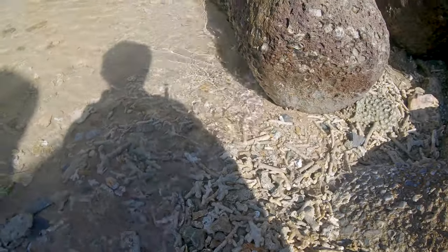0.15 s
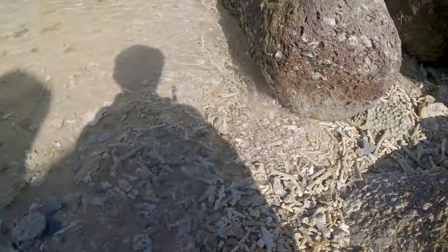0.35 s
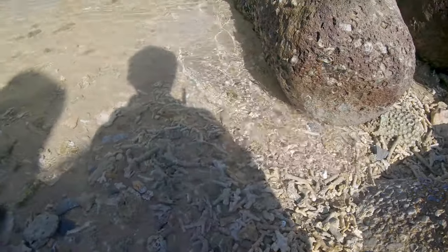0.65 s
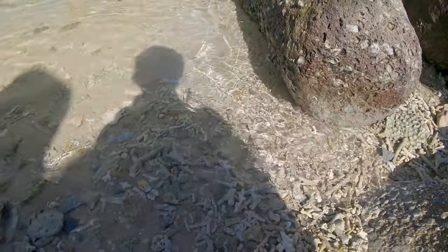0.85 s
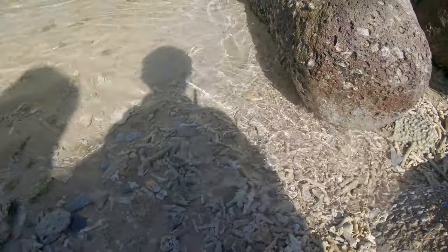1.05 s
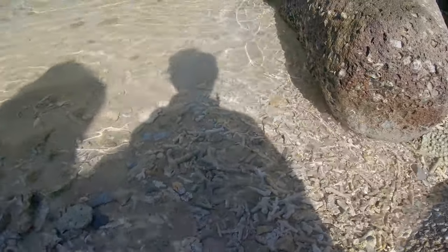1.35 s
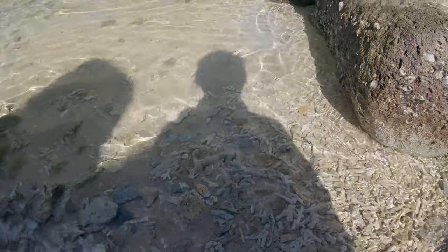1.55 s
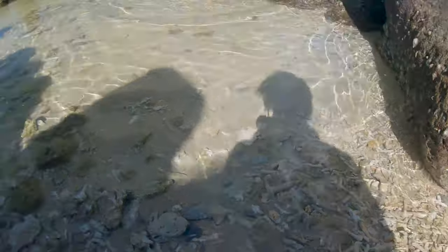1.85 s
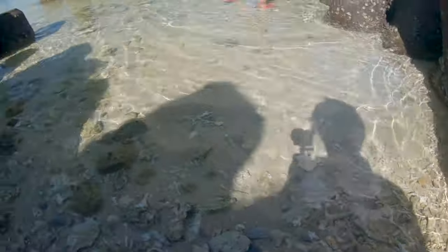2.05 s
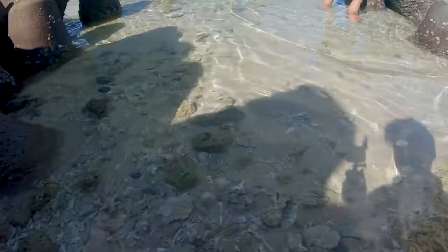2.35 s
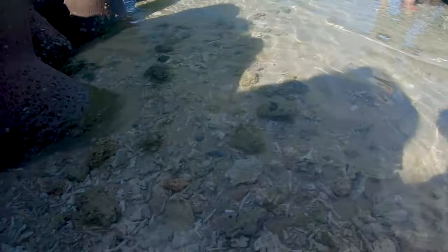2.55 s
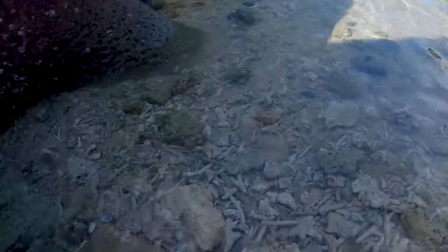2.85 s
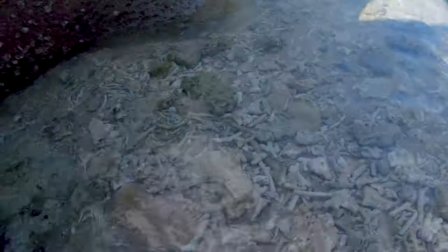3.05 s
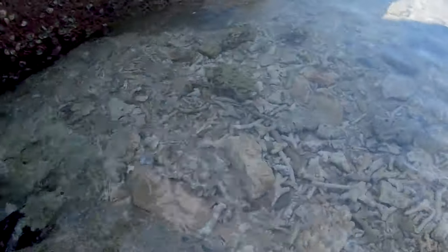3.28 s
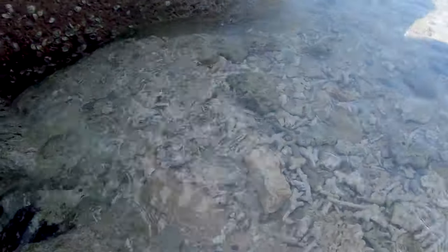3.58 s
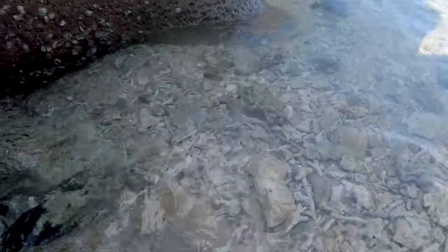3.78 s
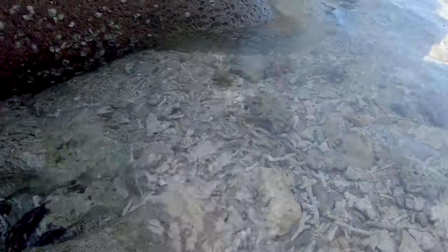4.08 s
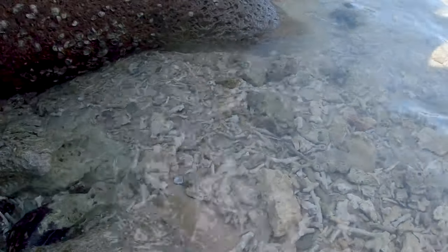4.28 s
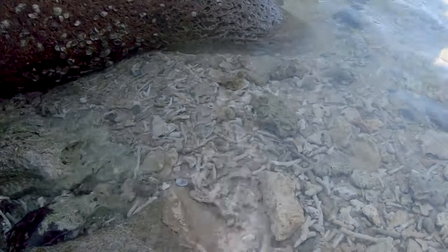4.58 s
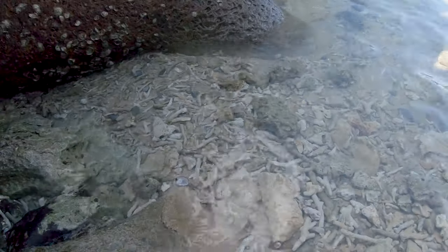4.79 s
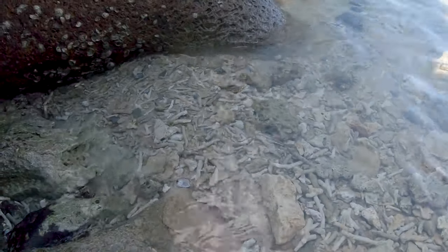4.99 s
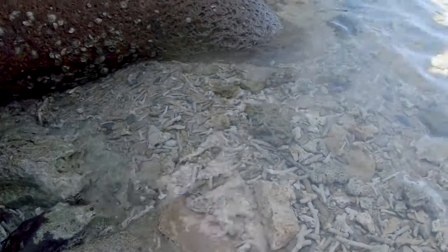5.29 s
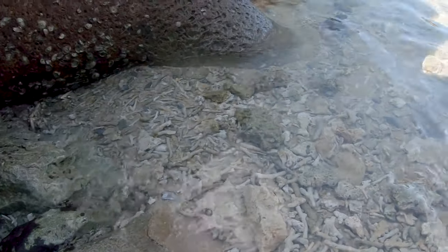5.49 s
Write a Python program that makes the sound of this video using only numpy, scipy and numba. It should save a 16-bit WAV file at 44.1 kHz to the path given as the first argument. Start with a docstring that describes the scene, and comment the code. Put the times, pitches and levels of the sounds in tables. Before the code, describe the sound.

Small swells splash and gurgle over coral rubble close by, with a crunchy clatter midway, then fade to faint trickling over low rumble.

```python
"""Small swells run up a shore of coral rubble between boulders and drain away again, close to the microphones.
Clouds of damped sines are the bubbles that gurgle, babble and fizz; filtered noise is the sheet of water.
Single plops, chirps and gulps are gliding sines; coral sticks crunch as noise bursts and clink as resonators.
Slow noise is wind on the microphone pair; a distant drone and open sea, also noise, lie underneath."""
import sys
import numpy as np
from scipy import signal
from scipy.fft import rfft, irfft, next_fast_len
from scipy.io import wavfile
from scipy.ndimage import uniform_filter1d
from numba import njit

SR = 44100
rng = np.random.default_rng(int(sys.argv[2]) if len(sys.argv) > 2 else 0)


def to_wav(s):
    """Save 16-bit WAV."""
    ch = np.atleast_2d(s).T  # columns
    pcm = np.round(np.clip(ch, -1, 1) * 32767)  # PCM
    wavfile.write(sys.argv[1], SR, pcm.astype(np.int16))


N = 248283


def from_db(db):
    """Decibels to gain."""
    return 10 ** (np.asarray(db) / 20)


def rms_one(x):
    """Scale to unit power."""
    return x / np.sqrt(np.mean(x ** 2) + 1e-20)


def at_hz(points, hz):
    """Read a spectrum on a log-frequency axis."""
    f, value = np.transpose(points)
    return np.interp(np.log(np.maximum(hz, 1)), np.log(f), value)


def colour(x, points, share=1):
    """Causal (minimum-phase) filter with the given spectrum, its decibels scaled by share."""
    size = 16384
    level_db = share * at_hz(points, np.fft.rfftfreq(size, 1 / SR))
    cepstrum = irfft(np.log(from_db(level_db)))
    # folding the cepstrum onto positive time makes the phase minimal
    cepstrum[1:size // 2] *= 2
    cepstrum[size // 2 + 1:] = 0
    response = irfft(np.exp(rfft(cepstrum)))[:size // 2]
    padded = next_fast_len(N + size)
    return irfft(rfft(x, padded) * rfft(response, padded), padded)[..., :N]


def band(x, low_hz, high_hz, order=2):
    """Butterworth band-pass."""
    edges = [low_hz, min(high_hz, SR / 2 - 1)]
    return signal.sosfilt(signal.butter(order, edges, "band", fs=SR, output="sos"), x + 1e-18)


def steady(x, span_s):
    """About unit power over every stretch of span_s; quicker detail stays."""
    power = uniform_filter1d(np.mean(x ** 2, axis=0), int(span_s * SR) + 1)
    smooth_power = uniform_filter1d(power, int(span_s * SR / 2) + 1)
    return x / np.sqrt(np.abs(smooth_power) + 1e-12)


def stereo_noise(alike):
    """White noise with the given left-right correlation."""
    mid, side = rng.standard_normal((2, N))
    alike = np.clip(alike, -1, 1)
    return (np.sqrt(1 + alike) * mid + np.sqrt(1 - alike) * side * [[1], [-1]]) / np.sqrt(2)


def sides(pan_db):
    """Left and right gains with a mean of one."""
    gains = from_db(np.array([pan_db, -pan_db]) / 2)
    return gains / gains.mean(axis=0)


def add(out, s, sound):
    """Mix a short stereo sound in at time s."""
    i = max(int(s * SR), 0)
    out[:, i:i + sound.shape[1]] += sound[:, :max(N - i, 0)]


def crackle(per_s, spread_db, pan_db):
    """Random clicks, mostly small, each from a direction of its own."""
    at, size, sign, pan, lag = rng.random((int(per_s * N / SR), 5)).T
    height = from_db(spread_db * np.minimum(-np.log(1 - size), 4.5)) * np.sign(sign - .5)
    left, right = sides(pan_db * (2 * pan - 1)) * height
    at = (at * N).astype(int)
    late = np.round(3 * (2 * lag - 1)).astype(int)   # samples, either way
    return np.array([np.bincount(at, left, N), np.bincount((at + late) % N, right, N)])


@njit
def ring_bubbles(start, gains, step, decay, rise, lag, length):
    """Damped sines, climbing as bubbles near the surface; the right side is lag samples later (or earlier)."""
    out = np.zeros((2, length))
    for k in range(len(start)):
        life, height, fade = int(6 / decay[k]), 1.0, np.exp(-decay[k])
        first = max(start[k], abs(lag[k]))
        for i in range(min(life, length - first - abs(lag[k]))):
            value = height * np.sin(step[k] * i * (1 + rise[k] * i / life))
            out[0, first + i] += gains[0, k] * value
            out[1, first + i + lag[k]] += gains[1, k] * value
            height *= fade
    return out


def bubble_cloud(per_s, low_hz, high_hz, cycles, spread_db, rise, pan_db=13.0, lag_s=0.00029):
    """Bubbles born at random, with scattered size, pitch, damping and direction."""
    at, size, pitch, damping, climb, pan, lag = rng.random((int(per_s * N / SR), 7)).T
    hz = low_hz * (high_hz / low_hz) ** pitch
    ring_cycles = cycles * 3.4 ** (2 * damping - 1)   # until 60 dB down
    decay = np.log(1000) * hz / (ring_cycles * SR)
    height = from_db(spread_db * np.minimum(-np.log(1 - size), 4.0)) * np.sqrt(hz / low_hz)
    gains = sides(pan_db * (2 * pan - 1)) * height
    start = (at * N).astype(np.int64)
    lag_samples = (lag_s * SR * (2 * lag - 1)).astype(np.int64)
    return ring_bubbles(start, gains, 2 * np.pi * hz / SR, decay, rise * 2 * climb, lag_samples, N)


def churn(depth_db, per_s):
    """Water tumbles unevenly: a random gain that changes per_s times a second."""
    steps = rng.standard_normal(2000)
    return from_db(depth_db * np.interp(np.arange(N) * per_s / SR, np.arange(len(steps)), steps))


def surge_db(crest_s, hold_s, build, drain):
    """Level that climbs to a crest, holds and falls, at so many dB a second."""
    t = np.arange(N) / SR - crest_s
    return np.maximum(build * np.minimum(t, 0) - drain * np.maximum(t - hold_s, 0), -120)


SLACK_PAN_DB = -4   # left-right balance of the slack water
# Swells running up the shore. Each row: crest in seconds, hold in seconds, build in dB/s,
# drain in dB/s before each water sound's own ratio, level in dB before each water sound's own offset,
# gurgle offset in dB, spray offset in dB, splashiness in dB, left-right balance in dB.
SWELLS = [(0.19, 0.093, 62, 46.5, -34.5, -15, -13.5, 2.5, -0.5),
          (1.161, 0.28, 400, 34, -55, -1.5, -6.5, -2.5, 0),
          (2.081, 0.23, 380, 100, -34.5, -12.5, -8, -5, -7.5),
          (2.401, 0.24, 61, 81, -31.5, -11, -12, -4.5, -5.5),
          (2.826, 0.024, 450, 242, -32.5, -8, -18, -6, 1), (3, 0.047, 123, 54, -44.5, -5, 0, 3.5, -4.5),
          (3.502, 0.24, 144, 26, -52.5, -2.5, -3.5, -4, -6), (4.944, 0.31, 48, 83, -57, -8, -4.5, -1, -4.5)]


def follow_swells(extra_db, drain_ratio, slack_db):
    """Left and right gain of one kind of water sound: all swells add in power over the slack water."""
    power = (from_db(slack_db) * sides(SLACK_PAN_DB)[:, None]) ** 2
    extras = extra_db + np.zeros(len(SWELLS))
    for (crest, hold, build, drain, db, *_, pan_db), extra in zip(SWELLS, extras):
        level_db = db + extra + surge_db(crest, hold, build, drain * drain_ratio)
        power = power + (from_db(level_db) * sides(pan_db)[:, None]) ** 2
    return np.sqrt(power)


# For each water sound: level against the swell (dB), draining speed against it (ratio), slack level (dB)
GURGLE_DB, GURGLE_DRAIN, GURGLE_SLACK_DB = -1, 1, -75
BABBLE_DB, BABBLE_DRAIN, BABBLE_SLACK_DB = -.5, 1.1, -76
SPRAY_DB, SPRAY_DRAIN, SPRAY_SLACK_DB = -4.5, 0.56, -67
SHEET_DB, SHEET_DRAIN, SHEET_SLACK_DB = -10.5, 1.65, -74.5
DROPLET_DB, DROPLET_DRAIN, DROPLET_SLACK_DB = -7, 0.88, -67.5


def gurgle(gurgle_db):
    """Low, heavily damped bubbles trapped by the swell."""
    bubbles = bubble_cloud(400, 395.0, 1090, cycles=8.9, spread_db=4.0, rise=0.15, pan_db=16.5)
    level = follow_swells(GURGLE_DB + gurgle_db, GURGLE_DRAIN, GURGLE_SLACK_DB)
    return steady(band(bubbles, 200, 1300), 0.19) * level


# Foaming water close by. Each row: frequency in Hz, relative level in dB.
WATER_SPECTRUM = [(120, -25), (200, -46), (596, -7), (769, -1.5), (1050, -3.5), (1560, 0.5), (2210, -2),
                  (2900, 0), (4180, -7.5), (5110, -4), (8980, -1), (12500, -1), (15500, -29)]


def babble(froth, tumble):
    """Slack water is mostly distinct ringing bubbles; a strong swell brings a dense froth of them."""
    trickle = steady(bubble_cloud(480, 850, 3000, cycles=30, spread_db=4.2, rise=.18, pan_db=11.0), .07)
    foam = bubble_cloud(1500, 700, 4500, cycles=14, spread_db=4.4, rise=.15, pan_db=11.0)
    splash = band(crackle(1400, 3.7, 4.9), 300, 3440)
    foam = colour(rms_one(foam) + .5 * rms_one(splash), WATER_SPECTRUM) * tumble
    return np.sqrt(1 - froth) * trickle + np.sqrt(froth) * steady(foam, 0.057)


STRAYS_PER_S, STRAY_DB, STRAY_FOLLOWS = 28, -62, 0.63   # rate, rms where babble is -57.5 dB, share of its swing


def stray_bubbles(flow):
    """Sparse, long-ringing bubbles at random, swinging less than the babble does."""
    strays = bubble_cloud(STRAYS_PER_S, 1293, 3220, cycles=48.6, spread_db=2.2, rise=0.144, pan_db=3.5)
    return rms_one(strays) * from_db(STRAY_DB) * (flow / from_db(-57.5)) ** STRAY_FOLLOWS


LAP_DB, LAPS_PER_S = 1, 22   # small ripples make the spray come and go
# Fizzing spray close by. Each row: frequency in Hz, relative level in dB.
SPRAY_SPECTRUM = [(1760, -33), (3000, -34), (3280, 0.5), (4590, -1), (6750, 5.5), (7690, -2), (8950, 2),
                  (9920, 1), (11800, -9.5), (14500, -17), (15500, -40)]


def spray(spray_db, froth, tumble):
    """The smallest bubbles ring only briefly and burst with a tick; now and then a bigger one pops."""
    fizz = rms_one(bubble_cloud(800, 3800, 11000, cycles=24, spread_db=4.8, rise=.06, pan_db=9.0))
    bursts = rms_one(crackle(2200, 4.2, 7.0))
    pops = rms_one(crackle(45, 2.1, 3.8))
    mist = (fizz + .85 * bursts + .5 * stereo_noise(.15)) * tumble
    sound = steady(colour(mist, SPRAY_SPECTRUM), .18) + 0.58 * rms_one(colour(pops, SPRAY_SPECTRUM))
    ripples = churn(LAP_DB, LAPS_PER_S) ** (1 - froth)   # froth evens them out
    return sound * ripples * follow_swells(SPRAY_DB + spray_db, SPRAY_DRAIN, SPRAY_SLACK_DB)


def droplets(splashy_db):
    """Small, high bubbles, more of them heard in a splashy swell through a higher level."""
    bubbles = bubble_cloud(320, 2600, 6400, cycles=36, spread_db=4.0, rise=.14, pan_db=9.0)
    return steady(bubbles, .12) * follow_swells(DROPLET_DB + splashy_db, DROPLET_DRAIN, DROPLET_SLACK_DB)


SHEET_BREAKUP = 0.56   # dB of smooth hiss lost for each dB of splashiness
# Smooth sheet of running water. Each row: frequency in Hz, relative level in dB.
SHEET_SPECTRUM = [(150, -60), (250, -18), (392, -7), (573, -7), (768, -9.5), (2200, 1.5), (2440, 1.5),
                  (4630, -10.5), (8920, -14.5), (15500, -44)]


def sheet(splashy_db):
    """Smooth noise of the running sheet of water, weaker where the swell is splashy."""
    hiss = rms_one(colour(stereo_noise(0.21), SHEET_SPECTRUM))
    return hiss * follow_swells(SHEET_DB - SHEET_BREAKUP * splashy_db, SHEET_DRAIN, SHEET_SLACK_DB)


def wash():
    """All the water sounds that rise and drain with the swells."""
    *_, gurgle_db, spray_db, splashy_db, _ = np.transpose(SWELLS)
    flow = follow_swells(BABBLE_DB, BABBLE_DRAIN, BABBLE_SLACK_DB)
    flow_db = 20 * np.log10(flow.mean(axis=0))
    froth = np.clip((flow_db + 63) / 30, .2, .75)   # share of foam in the babble
    tumble = churn(3.2, 90)   # shared by foam and spray
    return (flow * babble(froth, tumble) + stray_bubbles(flow) + gurgle(gurgle_db)
            + spray(spray_db, froth, tumble) + droplets(splashy_db) + sheet(splashy_db))


BREEZE_DB, BREEZE_PAN_DB = -50.5, 0   # steady air between gusts: rms level, left-right balance
WIND_TRIM_DB = 2.5   # gain of all gusts
# Wind at the microphones. Each row: frequency in Hz, relative level in dB.
WIND_SPECTRUM = [(8.8, 2), (15, 1), (54, 4), (74, -0.5), (108, -15.5), (130, -9), (170, -31), (290, -120)]
# Gusts at the microphones. Each row: peak in seconds, half width in seconds (amplitude down to 1/e),
# level in dB before WIND_TRIM_DB, left-right balance in dB.
GUSTS = [(0.07, 0.057, -38.5, 11), (0.18, 0.093, -41, 5), (1.19, 0.14, -45.5, 4), (1.42, 0.17, -45, -1),
         (1.73, .035, -33, 11), (1.88, 0.17, -44.5, 2.5), (2.61, 0.1, -42.5, 5), (2.95, 0.23, -46.5, 3),
         (3.62, 0.17, -53, -2), (4.36, 0.025, -42, 3), (4.86, 0.062, -36.5, 1), (5.06, 0.054, -37, 11),
         (5.169, 0.041, -35, 13), (5.29, 0.089, -39.5, 3), (5.62, 0.14, -48.5, 4)]


def wind():
    """Low noise buffets each microphone differently; breeze and gusts add in power."""
    t = np.arange(N) / SR
    power = (from_db(BREEZE_DB) * sides(BREEZE_PAN_DB)[:, None]) ** 2
    for s, width, db, pan_db in GUSTS:
        peak = from_db(db + WIND_TRIM_DB) * sides(pan_db)[:, None]
        power = power + peak ** 2 * np.exp(-2 * ((t - s) / width) ** 2)
    return np.sqrt(power) * steady(colour(stereo_noise(.4), WIND_SPECTRUM), .08)


DRONE_DB, DRONE_WANDER_DB = -53, 1.3   # typical level halfway through, and how much it wavers
DRONE_GROWTH_DB_PER_S = .5   # slowly louder
# Drone far off. Each row: frequency in Hz, relative level in dB.
DRONE_SPECTRUM = [(53, -40), (90, -1), (108, -12), (134, -3), (161, -10), (189, -6), (220, -12), (280, -29),
                  (333, -22), (420, -39), (550, -52), (920, -120)]


def drone():
    """A distant low rumble of noise reaches both microphones alike, wavering and slowly growing."""
    t = np.arange(N) / SR
    level = from_db(DRONE_DB + DRONE_GROWTH_DB_PER_S * (t - t.mean())) * churn(DRONE_WANDER_DB, 8)
    return level * steady(colour(stereo_noise(1.0), DRONE_SPECTRUM), 0.18)


FAR_SEA_DB = -65   # rms level
# Open water far off. Each row: frequency in Hz, relative level in dB.
FAR_SEA_SPECTRUM = [(150, -48), (250, 17.5), (458, -4.5), (795, 6), (961, -3), (1730, 0.5), (3890, -45),
                    (7000, -44), (9890, -11.5), (13700, -22), (15500, -45)]


def far_sea():
    """Open water sounds faintly and evenly: wide, coloured noise."""
    return from_db(FAR_SEA_DB) * rms_one(colour(stereo_noise(0.14), FAR_SEA_SPECTRUM))


SPLASH_CYCLES = 11.3   # a plop that rings this many cycles is as much splash as tone
# The loudest plops near the microphones. Each row: start in seconds, level in dB before a common trim,
# starting pitch in Hz, left-right balance in dB, cycles to die away by 60 dB.
PLOPS = [(0.128, -22, 1480, 4, 21), (0.15, -21.5, 980, 2, 23), (0.159, -13.5, 2880, 1, 50),
         (0.178, -22, 820, -4, 26), (0.203, -10, 2900, 0, 35), (0.234, -11, 2820, 1, 57),
         (0.249, -14.5, 2040, 2, 24), (0.256, -18, 1610, -2, 29), (0.335, -18.5, 1530, 2, 22),
         (0.356, -22, 1180, 1, 24), (0.432, -28, 1800, 0, 72), (0.484, -28.5, 900, -6, 36),
         (0.509, -26, 946, -8, 25), (0.545, -19.5, 4990, 0, 59), (0.948, -32, 2630, -6, 38),
         (1.025, -38.5, 2540, -4, 60), (1.146, -33, 6550, -4, 100), (1.166, -30, 1730, 4, 19),
         (1.284, -33.5, 2000, 4, 45), (1.4, -35.5, 690, -5, 13), (1.423, -32, 1750, 1, 30),
         (1.598, -38, 1040, -8, 28), (1.625, -43, 644, -3, 42), (1.858, -37, 1260, -9, 19),
         (1.947, -31.5, 946, -6, 17), (1.99, -31, 3110, -10, 49), (2.041, -21.5, 2400, -6.5, 15.5),
         (2.129, -22.5, 2100, -14, 94), (2.438, -18.5, 1650, -14, 49), (2.661, -23, 915, 6, 33),
         (2.717, -25, 614, 3, 25), (2.81, -24, 840, 6, 45), (2.829, -22, 790, 8, 9.5),
         (2.905, -21, 1710, 6, 26.5), (2.995, -27, 1273, 8, 60), (3.284, -30, 2830, -7, 26),
         (3.488, -37, 975, -1, 20), (3.595, -38.5, 625, -11, 33), (3.683, -37, 2510, -9, 52),
         (3.738, -33, 805, -14, 17), (5.297, -40, 1140, -6, 30), (5.536, -39, 7280, -11, 170)]


def plops(rise_per_s=1.8, splash_s=0.0049, lag_s=0.000092, trim_db=-1.5):
    """A cavity pinches off with a short splash around its own pitch and rings on as one big bubble."""
    out, t = np.zeros((2, N)), np.arange(SR // 10) / SR
    for s, db, hz, pan_db, cycles in PLOPS:
        age = np.maximum(t - lag_s * rng.random((2, 1)), 0)   # each side a little late
        ring = from_db(-60 * age * hz / max(cycles, 2))
        tone = np.sin(2 * np.pi * hz * age * (1 + rise_per_s * age)) * ring
        noise = rng.standard_normal(len(t)) + .5 * rng.standard_normal((2, len(t)))
        splash = steady(band(noise, hz * 0.48, hz * 1.91), 0.002) * np.exp(-t / splash_s)
        attack = 1 - np.exp(-3 * age * hz)   # the onset takes a fraction of one cycle
        gains = from_db(db + trim_db) * sides(pan_db)[:, None]
        add(out, s, gains * (tone + SPLASH_CYCLES / cycles * splash) * attack)
    return out


# Bending modes of a coral stick. Each row: frequency in Hz, relative level in dB,
# 60 dB decay time in seconds for a stick free to ring.
CORAL_MODES = [(4630, -46, 0.032), (5850, -13.5, 0.09), (6900, -19, .03), (9720, -1.5, 0.025),
               (10500, -2, 0.027), (12200, -23, 0.035), (13400, -19, .04), (14200, -32, .04)]


def coral_ring(clicks, freedom=1):
    """The bending modes of a coral stick; one wedged in the heap is less free to ring."""
    out = 0
    for hz, db, t60 in CORAL_MODES:
        r, w = from_db(-60 / (t60 * freedom * SR)), 2 * np.pi * hz / SR
        mode = signal.lfilter([0, np.sin(w)], [1, -2 * r * np.cos(w), r * r], clicks + 1e-18)
        out = out + from_db(db) * mode
    return out


RUBBLE_PAN_DB = -10.0   # the loose rubble lies to the right
# Colour of cracking and grinding rubble. Each row: frequency in Hz, relative level in dB.
GRIT_SPECTRUM = [(180, -6.5), (300, 3), (953, -11.5), (1070, -13), (5480, -10.5), (6250, -4.5), (9760, -15),
                 (11300, -22), (14300, -24), (15500, -44)]
# Coral sticks knocking together. Each row: start in seconds, level in dB before the crack and ring trims,
# ringing share as a ratio.
KNOCKS = [(0.131, -30.5, .3), (0.204, -22, 0.23), (0.647, -29.5, 0.11), (0.933, -29.5, 0.12),
          (1.589, -34.5, 0.11), (2.590, -17, 0.052), (2.934, -22.5, 0.32), (3.037, -15, 0.33),
          (3.049, -13.5, 0.39), (3.067, -14, 1), (3.089, -20.5, .22), (3.145, -25, 0.17),
          (3.192, -19, 0.16), (3.26, -18.5, 0.21), (4.325, -21.5, 0.11)]


def knocks(crack_s=0.004, crack_trim_db=-3.5, ring_trim_db=-4.0):
    """Each knock is a dry crack of noise plus the ring of the stick."""
    cracks, strikes, t = np.zeros((2, N)), np.zeros((2, N)), np.arange(SR // 50) / SR
    for s, db, share in KNOCKS:
        noise = 0.58 * rng.standard_normal(len(t)) + 1.38 * rng.standard_normal((2, len(t)))
        add(cracks, s, from_db(db + crack_trim_db) * noise * np.exp(-t / crack_s))
        add(strikes, s, from_db(db + ring_trim_db) * share * np.ones((2, 1)))
    cracks = band(colour(cracks, GRIT_SPECTRUM), 490, 21000)   # light sticks give no bass
    return (cracks + coral_ring(strikes)) * sides(RUBBLE_PAN_DB)[:, None]


CHIRP_S, CHIRP_SHORTENING = .025, 0.33   # length at 1 kHz; power of pitch by which it shrinks
# The clearest singing cavities nearby. Each row: start in seconds, first pitch in Hz, last pitch in Hz,
# level in dB before a common trim.
CHIRPS = [(0.231, 2820, 2700, -25), (0.302, 1477, 1860, -28.5), (0.331, 1500, 2710, -30),
          (0.77, 2050, 2250, -44.5), (0.798, 1840, 1990, -44), (0.941, 1935, 1630, -42),
          (1.283, 1903, 2270, -38), (2.885, 1410, 1520, -29), (3.143, 5920, 5570, -30),
          (3.169, 5120, 5130, -37), (3.197, 4650, 4460, -38.5), (3.217, 927, 894, -39.5),
          (3.742, 753, 905, -41), (3.78, 1163, 1280, -39.5), (3.803, 1660, 2940, -41),
          (4.13, 1674, 2400, -52), (4.934, 4210, 4670, -47.5), (4.974, 910, 1430, -42.5),
          (4.978, 560, 540, -42), (4.986, 1530, 2750, -43), (5.215, 1140, 950, -50)]


def chirps(pan_db=-2.0, scatter_db=2.0, trim_db=-2.5):
    """The pitch runs away ever faster as the cavity closes; the moving water shakes the tone."""
    out = np.zeros((2, N))
    for s, first_hz, last_hz, db in CHIRPS:
        length_s = CHIRP_S * (1000 / first_hz) ** CHIRP_SHORTENING
        u = np.linspace(0, 1, int(length_s * SR))
        phase = 2 * np.pi * np.cumsum(first_hz + (last_hz - first_hz) * u ** 2) / SR
        shake = 1 + .35 * np.interp(u, np.linspace(0, 1, 12), rng.standard_normal(12))
        envelope = np.minimum(u / 0.048, 1) * np.sqrt(1 - u ** 2)
        gains = from_db(db + trim_db) * sides(pan_db + scatter_db * rng.standard_normal())[:, None]
        tone = np.sin(phase + .5 * rng.standard_normal((2, 1)))
        add(out, s, gains * envelope * shake * tone)
    return out


# Water slapping into hollows. Each row: start in seconds, level in dB before a common trim,
# starting pitch in Hz, cycles to die away by 60 dB.
GULPS = [(2.584, -16, 350, 5.5), (2.59, -22.5, 148, 7.2), (2.612, -28.5, 215, 12), (2.653, -20.5, 520, 11),
         (2.657, -24, 171, 7.5), (2.829, -24.5, 286, 2.4), (3.064, -26.5, 231, 3.3), (3.308, -23.5, 535, 5),
         (3.309, -31.5, 195, 5.9)]


def gulps(rise_per_s=1.4, slosh_db=-12, slosh_cycles_ratio=1.8, trim_db=3.0):
    """Large air pockets under the rocks give a few low cycles, and the water sloshes around them."""
    out, t = np.zeros((2, N)), np.arange(SR // 6) / SR
    for s, db, hz, cycles in GULPS:
        tone = np.sin(2 * np.pi * hz * t * (1 + rise_per_s * t)) * from_db(-60 * t * hz / cycles)
        slosh = steady(band(rng.standard_normal((1, len(t))), 190, 530), 0.0093)
        slosh = slosh * from_db(slosh_db - 60 * t * hz / (cycles * slosh_cycles_ratio))
        attack = 1 - np.exp(-t / 0.00031)
        add(out, s, from_db(db + trim_db) * sides(-1.3)[:, None] * (tone + slosh) * attack)
    return out


SLIP_BUILD_DB_PER_S, SLIP_SETTLE_DB_PER_S = 688, 550
# The heap of rubble slips and grinds. Each row: peak in seconds, level in dB.
SLIPS = [(3.038, -28), (3.149, -37), (3.21, -54)]


def grinding():
    """Grinding rubble is a swarm of tiny knocks, rising and settling with each slip."""
    grains = crackle(4000, 4.8, 4.9)
    # each chip rings briefly at a pitch of its own
    squeak = rms_one(bubble_cloud(1500, 5420, 11550, cycles=51, spread_db=2.0, rise=0))
    wedged = rms_one(coral_ring(band(grains, 2100, 7100), freedom=0.21))
    grind = steady(rms_one(colour(grains, GRIT_SPECTRUM)) + .5 * squeak + 0.36 * wedged, 0.042)
    slipping = sum(from_db(db + surge_db(s, 0, SLIP_BUILD_DB_PER_S, SLIP_SETTLE_DB_PER_S)) for s, db in SLIPS)
    return slipping * grind * sides(RUBBLE_PAN_DB)[:, None]


def boulders(x, wet_db, t60):
    """Nearby rocks scatter a brief tail, different on each side."""
    t = np.arange(SR // 8) / SR
    tail = rng.standard_normal((2, len(t))) * from_db(-60 * t / t60) * (t > .0012)
    tail /= np.sqrt(np.sum(tail ** 2, axis=1, keepdims=True))
    return x + from_db(wet_db) * signal.fftconvolve(x, tail, axes=1)[:, :N]


def scene():
    """Water and rubble among the rocks, over wind, drone and far sea."""
    shore = wash() + plops() + knocks() + chirps() + gulps() + grinding()
    return boulders(shore, wet_db=-6.5, t60=0.065) + wind() + drone() + far_sea()


CUTOFF_HZ = 16100
# Balance of the microphone pair. Each row: frequency in Hz, left minus right in dB.
EAR_TILT = [(30, -3.5), (70, 1.5), (130, -1), (500, 3), (2000, 0), (4500, 0), (8000, -6), (14000, 5)]


def record(dry):
    """The two microphones colour the sound differently; the very bottom and the top are cut."""
    heard = np.array([colour(dry[0], EAR_TILT, .5), colour(dry[1], EAR_TILT, -.5)])
    heard = signal.sosfilt(signal.butter(1, 8, "high", fs=SR, output="sos"), heard)
    return signal.sosfilt(signal.cheby2(14, 70, CUTOFF_HZ, fs=SR, output="sos"), heard)


dry = scene()
out = record(dry)
to_wav(out)
```